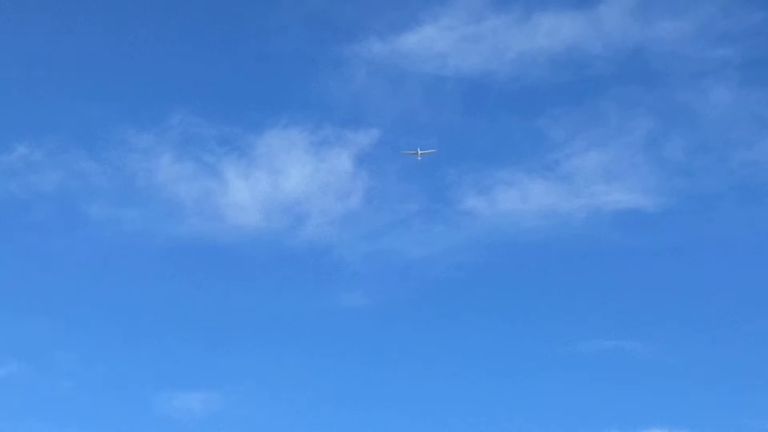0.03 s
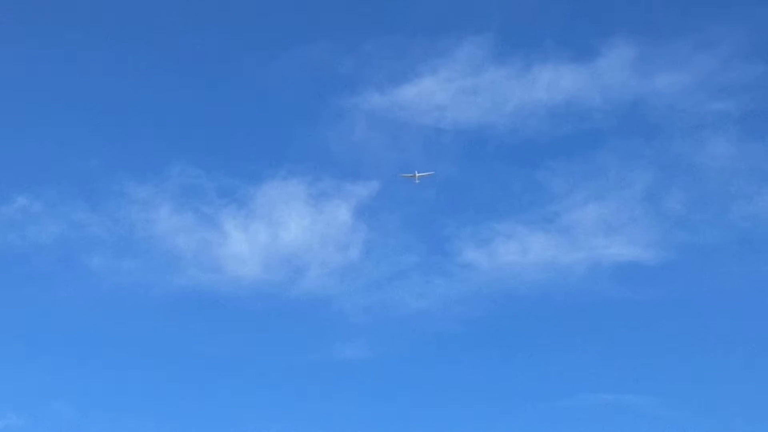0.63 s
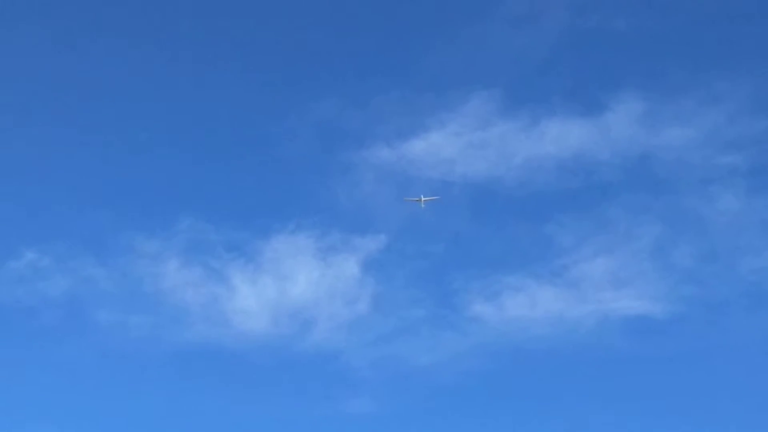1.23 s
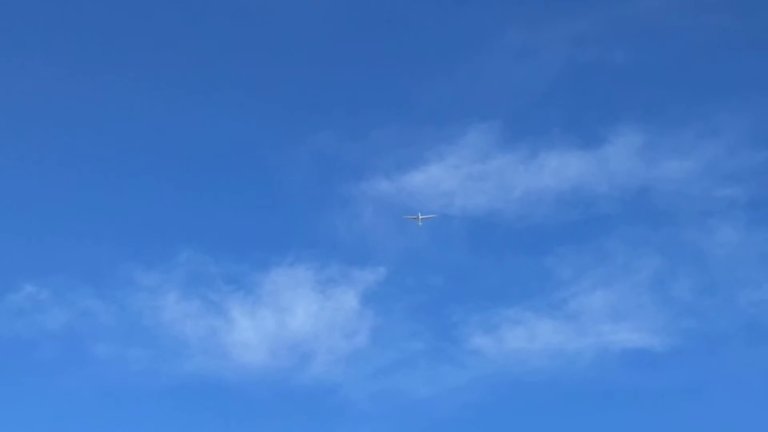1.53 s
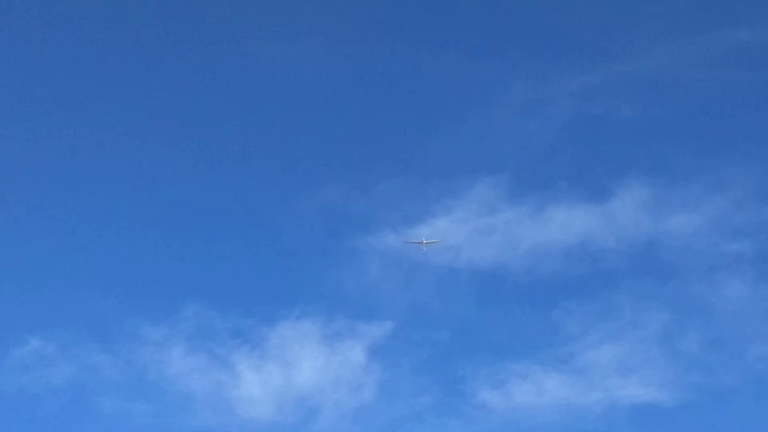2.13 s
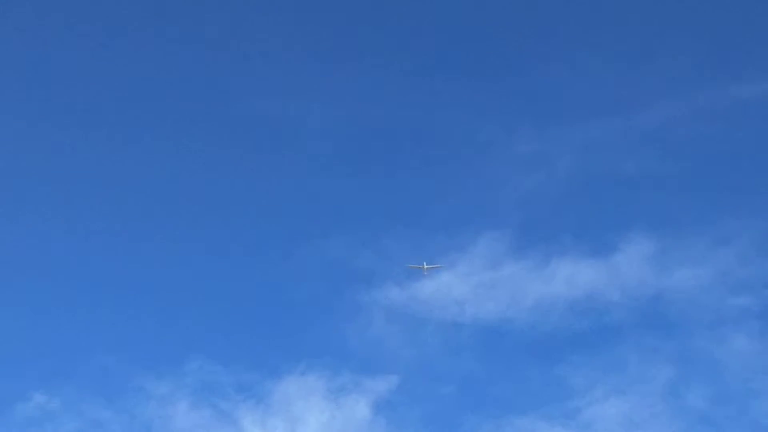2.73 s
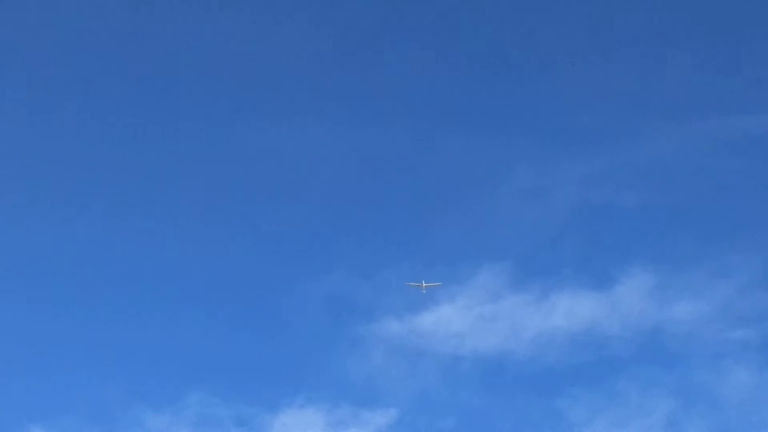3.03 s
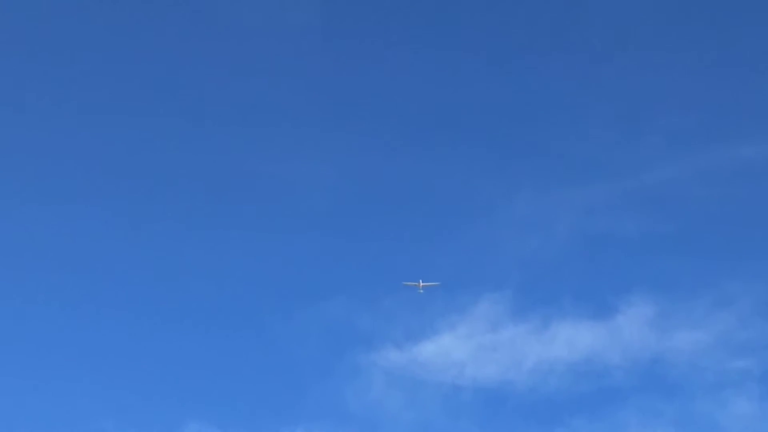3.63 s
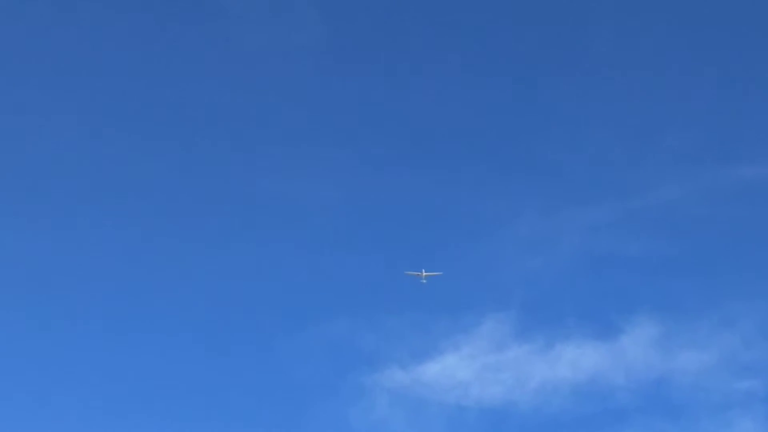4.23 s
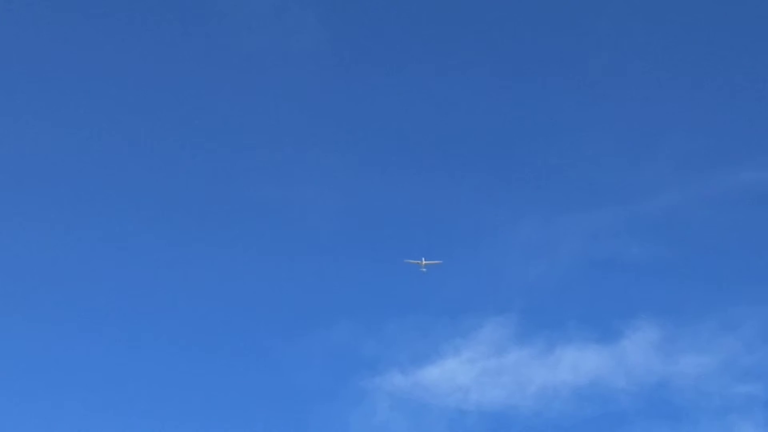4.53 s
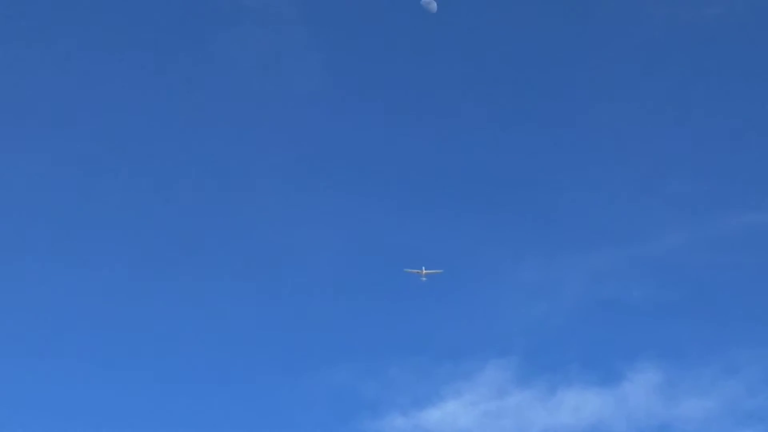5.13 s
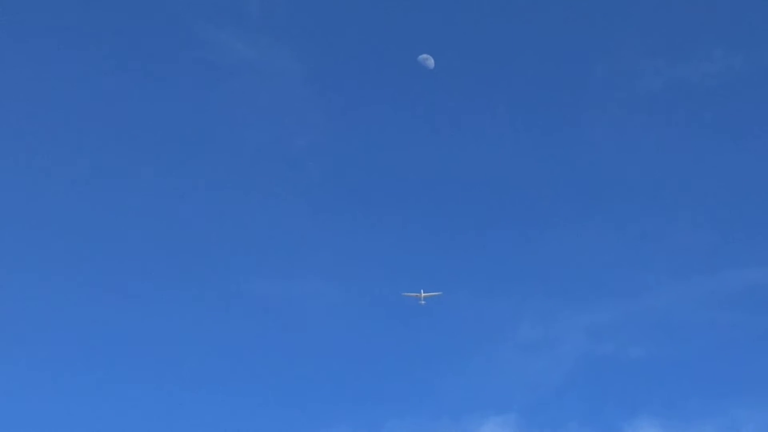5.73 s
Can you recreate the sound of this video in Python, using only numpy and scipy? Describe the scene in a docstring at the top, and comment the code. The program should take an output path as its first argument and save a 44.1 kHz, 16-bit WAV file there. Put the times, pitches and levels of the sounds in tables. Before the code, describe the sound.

Steady low engine drone outdoors, with irregular dry slaps and hiss from a launch cable and freshening gusts of wind.

```python
"""A glider launch on an open airfield, from a handheld camera some way off the V8 winch.
From the start the engine roars steadily, the running cable hisses and slaps with dry, irregular cracks,
and wind buffets the two microphone ports. Near 1 s the cable begins to sing in spells, rubbing in its
guide. The pull swells at 2.6 s. From 3.4 s the breeze freshens, and towards the end eddies thump the
ports hardest. The level dips briefly after hard gusts; the camera widens the stereo image throughout."""
import sys
import numpy as np
from scipy import signal
from scipy.fft import rfft, irfft
from scipy.io import wavfile
from scipy.ndimage import uniform_filter1d, map_coordinates

SR = 44100
rng = np.random.default_rng(int(sys.argv[2]) if len(sys.argv) > 2 else 0)


def transcribe(u):
    """Save the signal u as a 16-bit wav file named by the first command-line argument.

    u: samples, shape (n,) or (channels, n), limited to [-1, 1]; the rate is SR.
    q: integer samples, one column per channel.
    """
    v = np.clip(np.atleast_2d(u).T, -1, 1)
    q = np.round(v * 32767).astype(np.int16)
    wavfile.write(sys.argv[1], SR, q)


N = 259308
T = np.arange(N) / SR
HZ = np.maximum(np.fft.rfftfreq(N, 1 / SR), 1)
TOP_HZ = 15450

# Engine speed. Each row: time in seconds, four-stroke cycles per second.
ENGINE_SPEED = [(0, 21.23), (0.65, 21.02), (1.9, 21.14), (2.45, 21.14), (3.1, 21.08), (3.35, 21.1),
                (4.05, 21.25), (4.5, 21.11), (5.1, 21.01), (5.88, 20.95)]
# The pull swells mid-launch. Each row: time in seconds, relative engine level in dB.
ENGINE_LEVEL = [(0, -38.5), (0.45, -39), (0.85, -38), (1.7, -37.5), (2.6, -30.5), (3.0, -32.5),
                (3.3, -33.5), (4.4, -34), (5.88, -34.5)]
# Strong exhaust orders. Each row: multiple of the cycle rate, relative level in dB.
STRONG_ORDERS = [(3, -6.5), (4, -9.5), (5, 4), (7, 0), (8, -9.5), (9, -7), (10, -9), (11, -16.5), (12, -11),
                 (14, -30), (15, -21), (17, -21), (18, -37), (22, -22), (24, -19.5), (26, -24.5),
                 (31, -24.5), (42, -29), (44, -25), (67, -21.5), (85, -25.5)]
# Outline of all the weaker orders. Each row: frequency in Hz, relative level in dB.
WEAK_ORDER_SPECTRUM = [(20, -55), (42, -29), (125, -21), (300, -41), (600, -30), (1300, -52), (2200, -40.5)]
# The gears whine most under load. Each row: time in seconds, level in dB against ENGINE_LEVEL.
GEAR_WHINE = [(0, -2.5), (0.7, -7), (1.15, -9), (1.6, -4), (2.2, -5.5), (2.7, -5), (3.3, -3), (3.65, -3.5),
              (3.85, -9), (4.2, -6), (5.88, -7.5)]
# Noise colours at the microphone. Each row: frequency in Hz, relative level in dB.
ROAR_SPECTRUM = [(30, -44), (70, 1.5), (160, 2), (300, -5.5), (600, -19), (1300, -15.5), (2000, -27.5),
                 (4000, -94), (16000, -73)]
HISS_SPECTRUM = [(800, -19), (1800, 1.5), (2600, 0.5), (3400, 6.5), (4500, -3), (6500, -4.5), (10000, -8.5),
                 (15000, -15)]
CRACK_SPECTRUM = [(300, -17.5), (1200, -9), (2200, 0.5), (3400, 4.5), (5500, 8), (8000, 7), (11000, 5.5),
                  (15000, 6.5)]
WIND_SPECTRUM = [(20, -32), (35, -2.5), (60, 10), (120, 6.5), (200, 1), (400, -16), (800, -31), (1600, -50),
                 (6000, -95)]
# Resonances of the cable guide. Each row: centre in Hz, width in Hz.
GUIDE_MODES = [(3075, 320), (5795, 300)]
# The cable rubs in spells, then runs clear.
# Each row: time in seconds, then hiss, low song and high song in dB.
CABLE_RUB = [(0, -40.5, -51, -57), (0.42, -43, -48, -58), (0.78, -38, -43, -55),
             (0.84, -37.5, -36.5, -49.5), (0.93, -34.5, -37, -42), (1.0, -38, -43, -51),
             (1.25, -39.5, -45, -60), (1.45, -37, -35.5, -44.5), (1.75, -38.5, -43.5, -57),
             (2.07, -33.5, -38.5, -44), (2.25, -33.5, -38, -51), (2.42, -32, -37.5, -40),
             (2.7, -30, -38, -48), (3.0, -35, -44, -49), (3.28, -36, -34.5, -51), (3.42, -36, -50, -53),
             (4.05, -35, -55.5, -51), (4.9, -36.5, -48, -54), (5.05, -37, -63, -56),
             (5.88, -37.5, -68, -54)]
# Slaps and ticks. Each row: start in seconds, crack in dB, crack decay in seconds, rattle in dB.
CABLE_SLAPS = [(0.017, -38, .008, -33), (0.0625, -35, 0.0054, -27.5), (0.0962, -14.5, 0.0024, -29.5),
               (0.2565, -41, .004, -35.5), (0.3163, -17.5, 0.0082, -25.5), (0.378, -34, .006, -41),
               (0.4495, -25, 0.0067, -32.5), (0.5314, -19.5, 0.008, -26), (0.633, -27, 0.0033, -34),
               (0.7527, -20, 0.0032, -29.5), (0.9633, -27, 0.0061, -38), (0.98, -18, 0.0027, -33),
               (1.128, -30.5, .004, -36), (1.226, -25, 0.0033, -31), (1.3794, -20.5, 0.0096, -26.5),
               (1.462, -40, 0.0036, -37), (1.4882, -17.5, 0.0034, -28), (1.547, -25, 0.0078, -39),
               (1.665, -24.5, 0.0042, -26.5), (1.8914, -25, .005, -29), (2.285, -37, 0.0018, -39),
               (2.7677, -18.5, 0.012, -24.5), (2.9392, -25, .003, -33), (3.0327, -25.5, 0.0041, -27.5),
               (3.091, -20.5, 0.004, -27.5), (3.1694, -17, 0.0057, -24.5), (3.1836, -19, 0.0069, -31),
               (3.2535, -21.5, 0.008, -28), (3.288, -29, .005, -32), (3.339, -30, 0.0033, -36.5),
               (3.479, -35, .008, -35.5), (3.538, -26, .003, -33), (3.5868, -20, 0.008, -25.5),
               (3.68, -30, 0.0057, -35), (3.772, -27, 0.0043, -34), (3.78, -21, 0.0096, -31),
               (3.8401, -24.5, .004, -33), (3.9383, -18.5, 0.0065, -29.5), (4.075, -32, .007, -35),
               (4.1137, -20.5, .009, -26.5), (4.226, -29, .006, -30.5), (4.2534, -23, .007, -27),
               (4.446, -27, .003, -39), (4.4863, -20.5, 0.0055, -28), (4.522, -19.5, 0.0076, -29.5),
               (4.637, -23, .0045, -30), (4.7679, -21, 0.0065, -26.5), (5.105, -33, 0.0042, -42),
               (5.292, -24.5, .003, -34), (5.5563, -21, 0.013, -29), (5.691, -41, .005, -39.5)]
# The breeze freshens. Each row: time in seconds, relative level in dB.
BREEZE_LEVEL = [(0, -20.5), (1.3, -20.5), (2.7, -19.5), (3.4, -19.5), (5.88, -14)]
# Gusts at the microphone. Each row: peak time in seconds, relative level in dB, build-up in seconds,
# depth of the dip that follows in dB (none unless positive).
WIND_GUSTS = [(0.175, -18, 0.11, 3.5), (0.74, -25, 0.41, -6.5), (0.945, -15, 0.11, 3.5),
              (1.86, -21, 0.14, -1.5), (2.12, -14.5, 0.065, 2), (2.49, -18, 0.043, 2),
              (3.086, -15, 0.11, 5), (3.745, -17, 0.48, 3), (4.03, -15, 0.044, 2), (4.19, -14.5, 0.075, 3),
              (4.46, -12.5, 0.058, 3.5), (4.958, -11.5, 0.031, 4), (5.08, -18.5, 0.029, 0),
              (5.38, -11, 0.035, 2.5), (5.535, -15, 0.19, 0), (5.611, -15, 0.021, 10.5)]
# Eddies on the ports. Each row: time in seconds, relative level in dB, half length in milliseconds,
# share on the right port from 0 to 1.
PORT_EDDIES = [(0.127, -10, 1.0, 0.9), (0.138, -11, 0.5, 0.9), (0.856, -9, 0.45, 0.1),
               (0.8965, -10, 1.2, 0.15), (0.9135, -6, 1.2, 0.7), (0.9508, -3, 0.33, 0.02),
               (2.108, -11, 0.6, 0.8), (2.128, -10, 0.55, 0.8), (2.6538, -9, 0.7, 0.4),
               (3.075, -9, 0.6, 0.2), (3.079, -6, 1.0, 0.95), (3.620, -9, 0.5, 0.9), (3.667, -7, 0.7, 0.9),
               (3.7465, -3, 0.7, 0.95), (4.1526, -10, 0.7, 0.8), (4.19, -7, 2.0, 0.9),
               (4.402, -2, 1.1, 0.55), (4.4212, 0.5, 0.8, 0.6), (4.4345, 1, 0.6, 0.6),
               (4.4486, -6, 0.6, 0.9), (4.460, -7, 1.2, 0.9), (4.5005, -11, 0.4, 0.7), (4.506, 0, 1.0, 0.6),
               (4.664, -10, 0.6, 0.6), (4.953, 0.5, 1.0, 0.85), (4.984, -4, 1.1, 0.9),
               (5.0525, -6, 0.45, 0.9), (5.068, -9, 0.25, 0.1), (5.1635, -8, 0.6, 0.9),
               (5.278, -8, 0.6, 0.85), (5.343, -7, 0.55, 0.85), (5.366, -3, 2.4, 0.98),
               (5.3915, -10, 0.5, 0.9), (5.424, -5, 0.45, 0.9), (5.528, -5, 1.2, 0.95),
               (5.5427, -7, 0.9, 0.95), (5.5855, -11, 0.5, 0.3), (5.605, 0.5, 0.38, 0.85),
               (5.6125, 0, 0.9, 0.75)]


def engine(cycle_hz, level_db, whine_db, tone_db=19.5, roar_db=10, throb=0.17, jitter=0.00181):
    """The winch across the field: exhaust, drone and gears over combustion roar throbbing once a cycle."""
    phase = 2 * np.pi * np.cumsum(cycle_hz * (1 + jitter * walk(24.89))) / SR
    tones = undb(tone_db + walk(30)) * exhaust(phase)
    whine = gear_whine(cycle_hz, phase, whine_db)
    roar_colour = shape(ROAR_SPECTRUM, HZ)
    roar = undb(roar_db) * (1 + throb * np.cos(phase)) * noise(roar_colour)[0]
    direct = from_winch(tones + roar) + from_winch(whine, lag_s=0.0003)
    scattered = noise(roar_colour)
    return undb(level_db) * (direct + scattered) + from_winch(drone(phase, level_db))


def exhaust(phase, pipe_hz=140, pipe_width_hz=60, waver_db=1.12, count=100):
    """Uneven firings repeat every cycle and ring the pipe; each order wavers in the moving air."""
    orders = np.arange(1, count + 1)
    hz = orders * ENGINE_SPEED[0][1]
    gains = shape(WEAK_ORDER_SPECTRUM, hz)
    for order, db in STRONG_ORDERS:
        gains[order - 1] = undb(db)
    # the pipe holds back the orders near its resonance, so each cycle sweeps downward
    lags = 4 * np.arctan2(hz * pipe_width_hz, pipe_hz ** 2 - hz ** 2)
    lags += rng.standard_normal(count) * (orders / 20) ** 2
    wavers = [undb(waver_db * walk(8.3)) for _ in range(10)]
    return unit(sum(gain * wavers[k % 10] * np.sin(k * phase - lag)
                    for k, gain, lag in zip(orders, gains, lags)))


def gear_whine(cycle_hz, phase, level_db, order=56, wander=0.003, chatter_db=3):
    """The gears whine at a multiple of the cycle rate, chattering in level and wavering in pitch."""
    play = 2 * np.pi * np.cumsum(cycle_hz * wander * walk(40)) / SR
    return undb(level_db + chatter_db * walk(70)) * np.sin(order * (phase + play))


def drone(phase, engine_db, order=35, level_db=-39, swell_share=0.8):
    """One clean engine order drones on, following only a share of the swell."""
    return undb(level_db + swell_share * (engine_db - engine_db.mean())) * np.sin(order * phase)


def from_winch(x, lag_s=0.00034):
    """The winch stands to the right of the microphone, so its sound reaches the left port later."""
    return np.array([delayed(x, lag_s), x])


def running_cable(hiss_db, songs_db, flutter_db=0.9, wander=0.005, rasp_db=0.8, core_gain=0.45):
    """The cable hisses; where it rubs unevenly, each guide mode sings with a rasp and a wandering pitch."""
    flutter, grain = flutter_db * walk(30), walk(300)
    out = undb(hiss_db + flutter + grain) * noise(shape(HISS_SPECTRUM, HZ))
    for (hz, width_hz), song_db in zip(GUIDE_MODES, songs_db):
        warped_s = T + np.cumsum(wander * walk(30)) / SR
        pure_core = core_gain * resonance(HZ, hz, width_hz=40)
        ring = noise(resonance(HZ, hz, width_hz) ** 2 * (1 + pure_core))
        ring *= unit(undb(rasp_db * walk(180)))
        song = np.array([map_coordinates(port, [warped_s * SR], mode="mirror") for port in ring])
        out += undb(song_db) * song
    return out


def cable_slaps(snap_db=-3, snap_s=0.0009, rattle_s=0.031, travel_s=0.0009, grain_db=0.5):
    """Each slap cracks, brighter when harder, then rebounds; a duller rattle rings the guide."""
    out, size = np.zeros((2, N)), SR // 5
    t, hz = T[:size], np.maximum(np.fft.rfftfreq(size, 1 / SR), 100)
    hardest_db = max(row[1] for row in CABLE_SLAPS)
    octaves = np.log2(hz / 8000)
    rattle_body = undb(-5.5 * octaves) * abs(1 + resonance(hz, *GUIDE_MODES[0]))
    # bending waves run along the cable: the highest arrive first, lower ones lag by travel_s * (sqrt(TOP_HZ /
    # f) - 1)
    bending = np.exp(-2j * np.pi * travel_s * (2 * np.sqrt(hz * TOP_HZ) - hz))
    attack, rattle = 1 - np.exp(-t / .0001), np.exp(-t / rattle_s)
    for start_s, crack_db, crack_s, rattle_db in CABLE_SLAPS:
        db_per_octave = 0.8 - 0.014 * (hardest_db - crack_db) - 0.05 * rng.standard_normal()
        colour = shape(CRACK_SPECTRUM, hz) * undb(db_per_octave * octaves)
        steps = np.repeat(rng.standard_normal(size // 20 + 1), 20)[:size]
        grains = unit(undb(grain_db * steps))
        contacts = undb(snap_db) * np.exp(-t / snap_s) + rebounds(t)
        crack = np.hypot(np.exp(-t / crack_s), contacts)
        start = int(start_s * SR)
        for envelope, db, body in ((crack, crack_db, 1), (rattle, rattle_db, rattle_body)):
            burst = unit(filtered(rng.standard_normal((2, size)), colour * body))
            arrived = filtered(burst * grains * attack * envelope, bending)
            out[:, start:start + size] += undb(db) * arrived[:, :N - start]
    return out


def rebounds(t, count=3, gap_s=0.009, loss_db=6, tick_s=0.0018):
    """Envelope of the ever weaker ticks with which the cable settles after a slap."""
    contacts_s = np.cumsum(gap_s * rng.uniform(.6, 1.4, count))
    return sum(undb(-loss_db * k) * (t > s) * np.exp(-abs(t - s) / tick_s)
               for k, s in enumerate(contacts_s, 1))


def wind(level_db, rumble_db=-4.5, flurry_db=2.5, tear_db=-18, push_db=-11, growth=0.99):
    """Right on the microphone: turbulence rumbles and tears at each port, and pushes on both at once."""
    flurry = flurry_db * np.array([walk(45), walk(45)])
    colour = shape(WIND_SPECTRUM, HZ)
    rumble = undb(level_db + rumble_db + flurry) * noise(colour)
    force = undb(level_db.max() + growth * (level_db - level_db.max() + flurry))
    tear = undb(tear_db) * noise(colour * low_cut(600))
    push = undb(push_db) * noise(colour * low_cut(130))[0]
    return rumble + force * (tear + push)


def wind_strength(breeze_db, fall_s=0.02):
    """Wind level in dB: each gust swells out of the breeze and falls away quickly."""
    power = undb(breeze_db) ** 2
    for peak_s, db, build_s, _ in WIND_GUSTS:
        width_s = np.where(T < peak_s, build_s, fall_s)
        power += undb(db) ** 2 * np.exp(-((T - peak_s) / width_s) ** 2)
    return 10 * np.log10(power)


def eddies():
    """An eddy pushes on a port, then leaves a weaker suction twice as long; ports pass no deep bass."""
    out = np.zeros((2, N))
    for s, db, half_ms, right in PORT_EDDIES:
        near = slice(int((s - .03) * SR), int((s + .03) * SR))
        passage = (T[near] - s) * 1000 / half_ms
        push = np.exp(-passage ** 2 / 2)
        suction = np.exp(-(passage - 3.5) ** 2 / 8) / 2
        out[:, near] += np.outer([1 - right, right], undb(db) * (push - suction))
    return filtered(out, low_cut(45, order=4))


def gust_dips(attack_s=0.0065, hold_s=0.16, recovery_db_per_s=5):
    """Level change in dB: a quick drop as a hard gust breaks, a short hold, a steady climb back."""
    deepest = np.zeros(N)
    for peak_s, _, _, dip_db in WIND_GUSTS:
        onset = np.clip((T - peak_s) / attack_s, 0, 1)
        recovered_db = recovery_db_per_s * np.maximum(T - peak_s - hold_s, 0)
        deepest = np.maximum(deepest, onset * (dip_db - recovered_db))
    return -deepest


def undb(db):
    """Decibels to gain."""
    return 10 ** (np.asarray(db) / 20)


def unit(x):
    """Scale to rms 1."""
    return x / np.sqrt(np.mean(x ** 2))


def curves(table):
    """Each column after the time as a value per sample."""
    times, *columns = np.transpose(table)
    return [np.interp(T, times, column) for column in columns]


def shape(spectrum, hz):
    """Gain of a spectrum table at the given frequencies."""
    points_hz, db = np.transpose(spectrum)
    return undb(np.interp(np.log(hz), np.log(points_hz), db))


def resonance(hz, centre_hz, width_hz):
    """Gain of one resonance, 1 at its centre."""
    return 1 / (1 + 2j * (hz - centre_hz) / width_hz)


def low_cut(corner_hz, order=2):
    """Gain that rolls off the bass."""
    return HZ ** order / (HZ ** order + corner_hz ** order)


def filtered(x, gain):
    """Apply a gain per frequency."""
    return irfft(rfft(x) * gain, x.shape[-1])


def delayed(x, seconds):
    """Delay by a fraction of a millisecond."""
    return filtered(x, np.exp(-2j * np.pi * HZ * seconds))


def noise(gain):
    """Coloured noise, unrelated at the two ports."""
    return unit(filtered(rng.standard_normal((2, N)), gain))


def walk(rate):
    """Random levels held 1 / rate seconds and smoothed twice; spread near 1."""
    hold = max(int(SR / rate), 2)
    held = np.repeat(rng.standard_normal(N // hold + 1), hold)
    return unit(uniform_filter1d(uniform_filter1d(held, hold), hold)[:N])


def scene():
    """From the camera position: the winch some way off, its cable, and wind on the two ports."""
    cycle_hz, = curves(ENGINE_SPEED)
    engine_db, = curves(ENGINE_LEVEL)
    whine_db, = curves(GEAR_WHINE)
    hiss_db, *songs_db = curves(CABLE_RUB)
    breeze_db, = curves(BREEZE_LEVEL)
    dip_db = gust_dips()
    steady = engine(cycle_hz, engine_db, whine_db) + running_cable(hiss_db, songs_db)
    return undb(dip_db) * steady + cable_slaps() + wind(wind_strength(breeze_db + dip_db)) + eddies()


def record(dry, crossfeed=0.79, lag_s=0.000425):
    """The camera widens: each channel loses a delayed share of the other. Peaks round off, the top is cut."""
    wide = dry - crossfeed * delayed(dry[::-1], lag_s)
    rounded = wide / (1 + wide ** 4) ** (1 / 4)
    return signal.sosfilt(signal.ellip(8, .2, 70, TOP_HZ, fs=SR, output="sos"), rounded)


dry = scene()
out = record(dry)
transcribe(out)
```